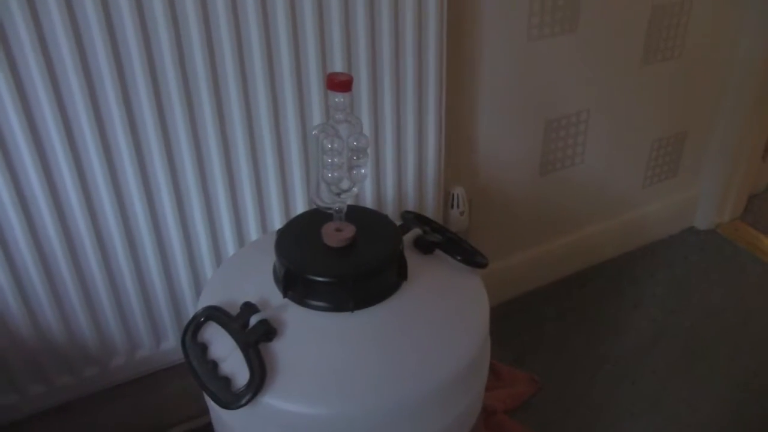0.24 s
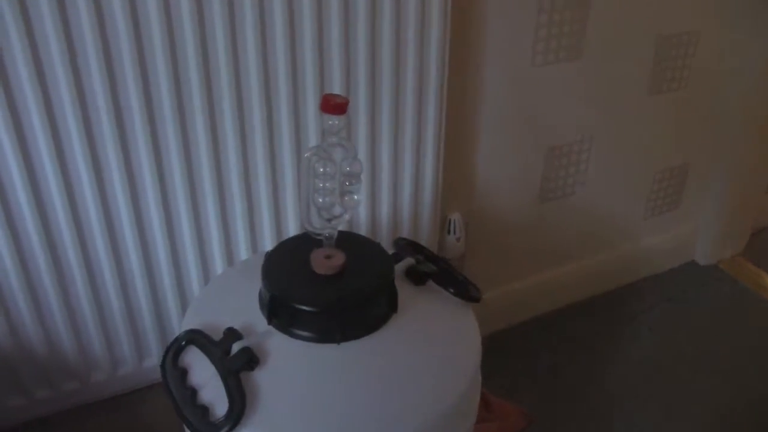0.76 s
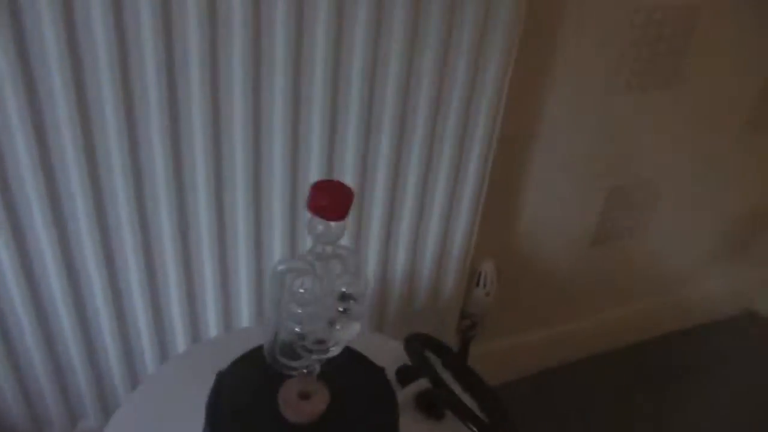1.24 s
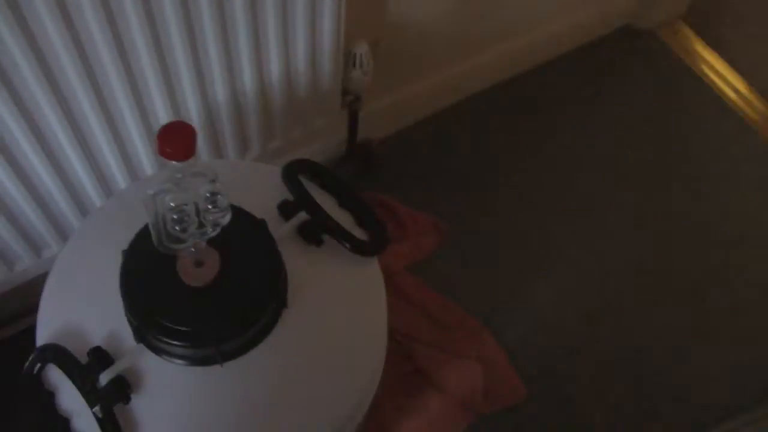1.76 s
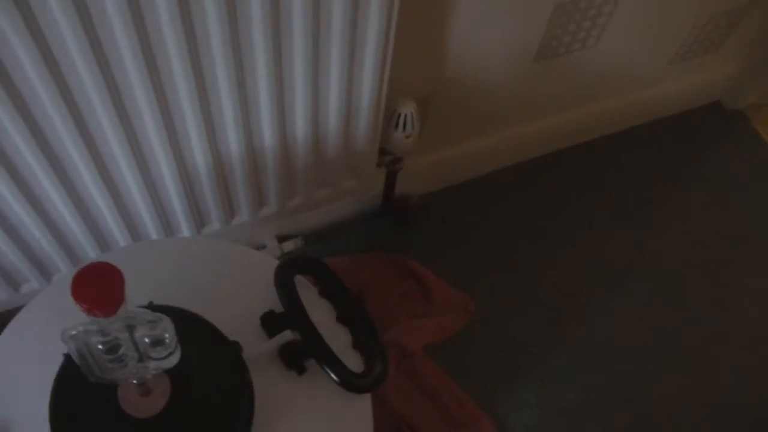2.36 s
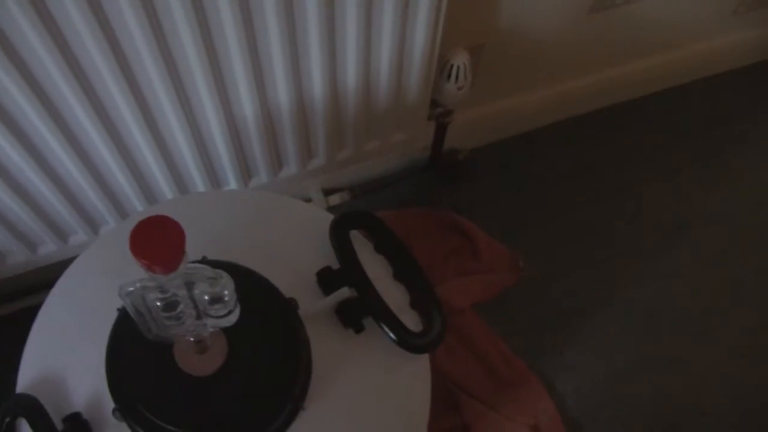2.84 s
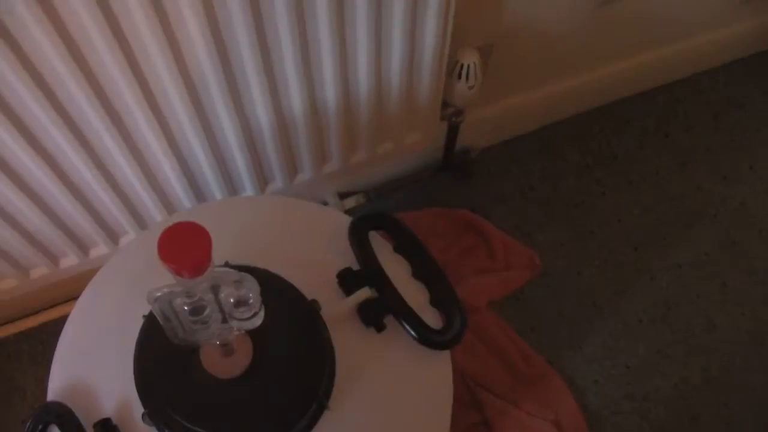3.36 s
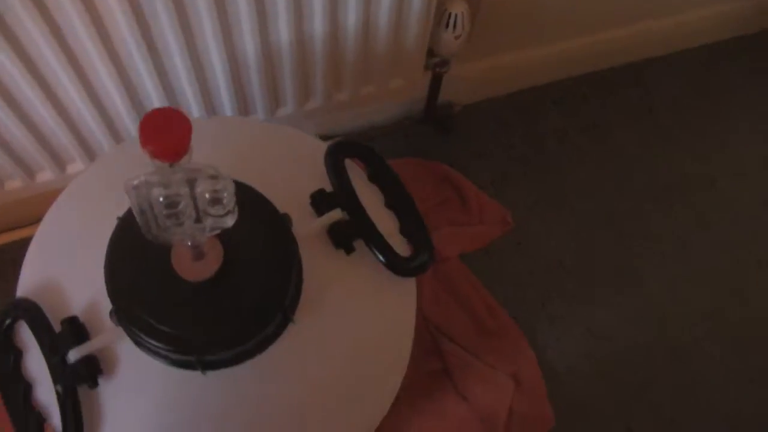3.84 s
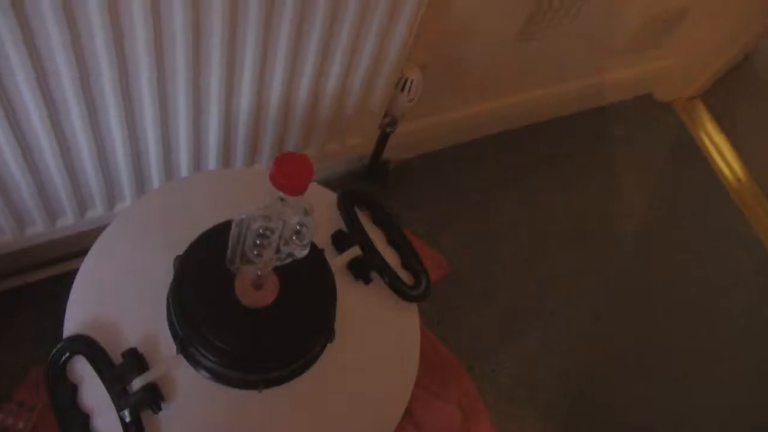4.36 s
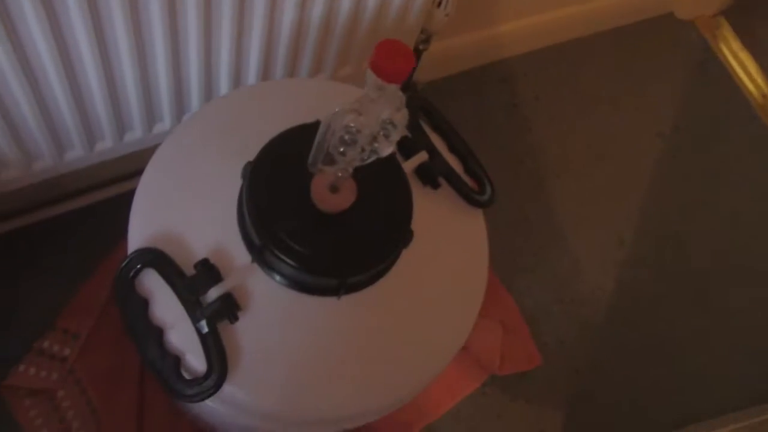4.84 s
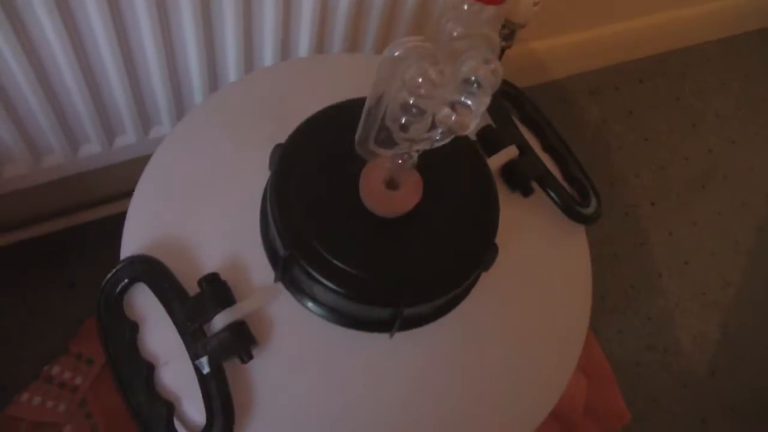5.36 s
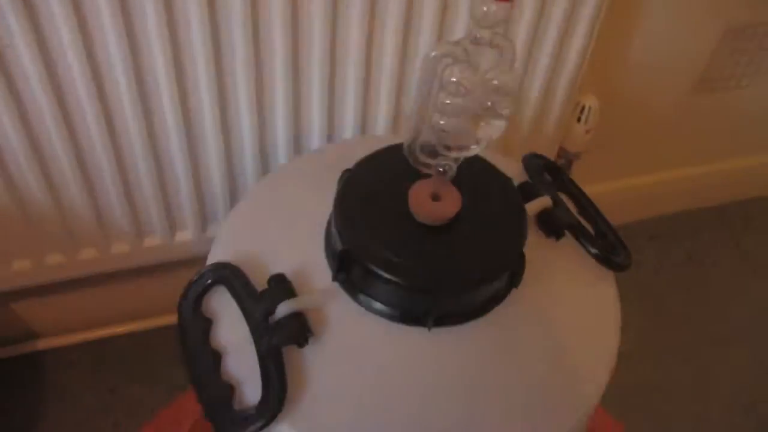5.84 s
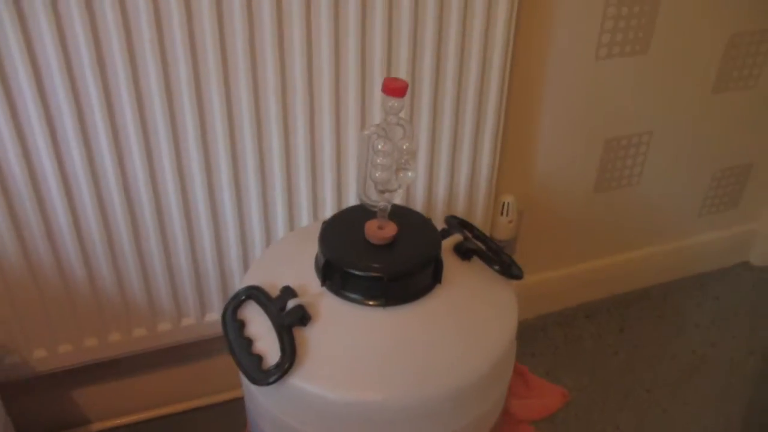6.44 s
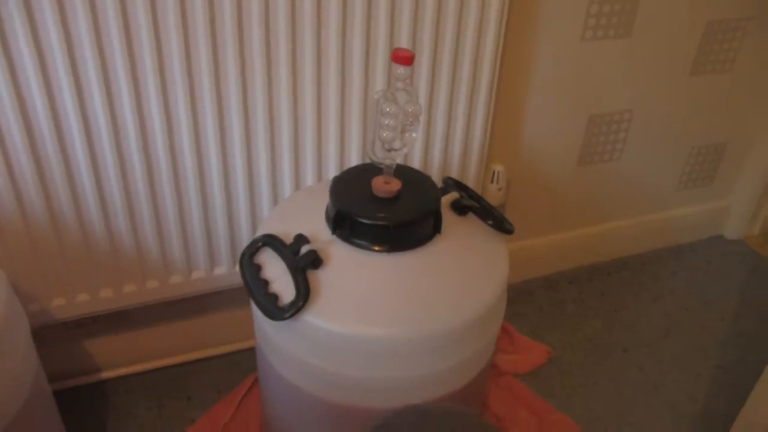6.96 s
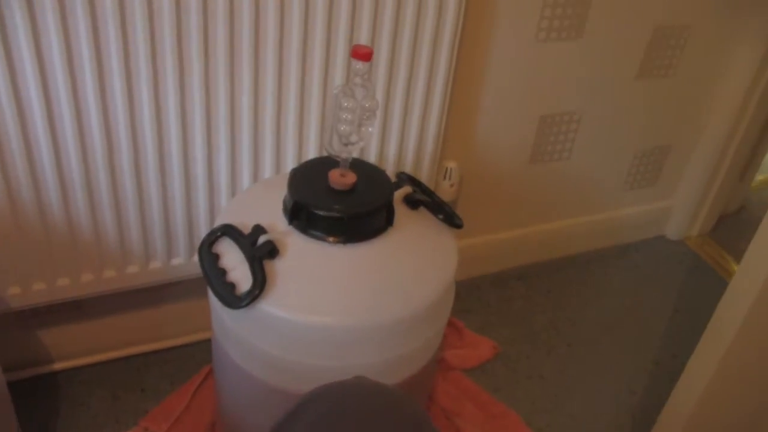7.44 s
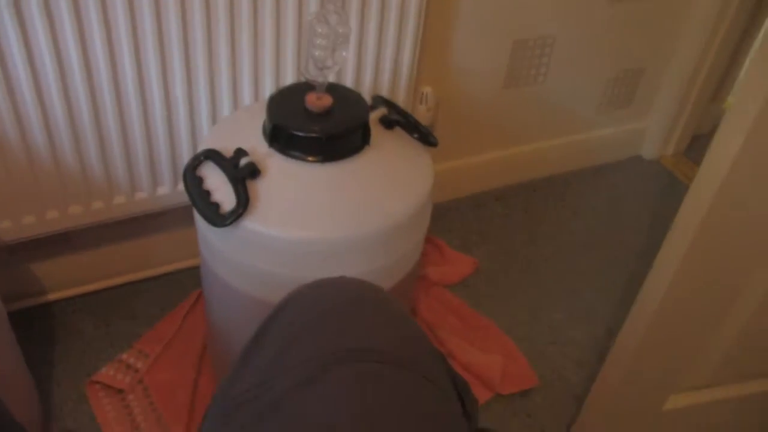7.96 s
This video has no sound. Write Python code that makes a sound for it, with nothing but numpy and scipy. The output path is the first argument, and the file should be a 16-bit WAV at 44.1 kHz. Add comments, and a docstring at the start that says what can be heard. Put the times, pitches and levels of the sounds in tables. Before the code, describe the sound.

A handheld microphone hears a small carpeted room with a soft steady hiss. A person moves nearby, fabric brushing, a gentle footfall and light plastic ticks. After a lull, a single bright watery pop bursts from the airlock, far louder than everything else. Later come sharp little clicks, a quick low-level gurgle with froth, a dull floor thump, brisk cloth swishes and a tiny knock on the hollow bucket.

```python
"""A small carpeted room with a water airlock on a plastic fermenting bucket.
One bubble bursts with a sharp pop: short snaps ring the airlock's modes, with spray noise and gliding gulps.
Later the water gurgles and froths softly, as short tones that slide in pitch.
Someone moves close by: clothes (shaped noise and crackles), footfalls (damped sines), ticks (noise bursts),
knocks on the bucket (modes) and plastic squeaks (glides), over room tone and a faint hum (filtered noise)."""
import sys
import numpy as np
from scipy import signal
from scipy.fft import rfft, irfft, next_fast_len
from scipy.io import wavfile

SR = 44100
rng = np.random.default_rng(int(sys.argv[2]) if len(sys.argv) > 2 else 0)


def pcm_store(signal):
    """Save signal as 16-bit PCM."""
    levels = np.round(np.clip(np.atleast_2d(signal), -1, 1) * 32767)
    wavfile.write(sys.argv[1], SR, levels.astype(np.int16).T)


N = 361487
CUTOFF_HZ = 15900


def from_db(db):
    """Amplitude ratio of a level in dB."""
    return 10 ** (np.asarray(db) / 20)


def rms_one(x):
    """Scale to rms 1."""
    return x / np.sqrt(np.mean(x ** 2) + 1e-20)


def at_hz(points, hz):
    """Read a table on a log-frequency axis."""
    known_hz, values = np.transpose(points)
    return np.interp(np.log(np.maximum(hz, 1)), np.log(known_hz), values)


def seconds(length_s):
    """Time axis in seconds."""
    return np.arange(int(length_s * SR)) / SR


def fade(t, t60_s):
    """Exponential decay, 60 dB down at t60."""
    return np.exp(-np.log(1000) * t / t60_s)


def add(track, start_s, sound):
    """Mix a sound into the track, cut at its end."""
    start = int(round(start_s * SR))
    track[start:start + len(sound)] += sound[:N - start]


def noise(spectrum, size):
    """Noise of the given colour, rms 1."""
    hz = np.fft.rfftfreq(size, 1 / SR)
    white = rng.standard_normal(size)
    return rms_one(irfft(rfft(white) * from_db(at_hz(spectrum, hz)), size))


def drift(rate_hz):
    """Random values of spread 1, joined by straight lines."""
    knots = rng.standard_normal(N // 20)
    return np.interp(np.arange(N) / SR * rate_hz, np.arange(len(knots)), knots)


def band(x, low_hz, high_hz, order=1):
    """Butterworth band-pass."""
    edges_hz = [low_hz, min(high_hz, .45 * SR)]
    return signal.sosfilt(signal.butter(order, edges_hz, "band", fs=SR, output="sos"), x)


def modes(table, t):
    """A body's ring after one sharp blow: a sum of damped cosines."""
    return sum(from_db(db) * np.cos(2 * np.pi * hz * t) * fade(t, t60_s) for hz, db, t60_s in table)


def strokes(rows, attack_s, release_s):
    """Power of a series of strokes: each swells, holds for its length and dies away."""
    power = np.zeros(N)
    for start_s, length_s, db in rows:
        t = seconds(length_s + 5 * release_s)
        level = np.minimum(t / attack_s, 1) * np.exp(-np.maximum(t - length_s, 0) / release_s)
        add(power, start_s, (from_db(db) * level) ** 2)
    return power


def glides(rows, waver, overtone_db):
    """Short tones that swell, slide in pitch and die away, with a weak octave."""
    out, unsteady = np.zeros(N), drift(500)
    for start_s, db, start_hz, end_hz, swell_s, fade_s in rows:
        t = seconds(swell_s + 2 * fade_s)
        hz = np.interp(t, [0, swell_s + fade_s], [start_hz, end_hz])
        hz = hz * (1 + waver * unsteady[int(start_s * SR):][:len(t)])
        phase = 2 * np.pi * np.cumsum(hz) / SR
        level = np.minimum(t / swell_s, 1) * np.exp(-3 * (np.maximum(t - swell_s, 0) / fade_s) ** 1.5)
        add(out, start_s, from_db(db) * level * (np.sin(phase) + from_db(overtone_db) * np.sin(2 * phase)))
    return out


def two_microphones(mid, side):
    """Two close microphones hear nearly the same; returns left and right."""
    # Each row: frequency in Hz, side against mid in dB.
    width_table = [(30, -32), (130, -6.5), (250, -7.5), (500, -6.5), (2000, -11.5), (5000, -14.5),
                   (14000, -11.5)]
    size = next_fast_len(N)
    width = from_db(at_hz(width_table, np.fft.rfftfreq(size, 1 / SR)))
    return mid[:N] + irfft(rfft(side, size) * width, size)[:N] * np.array([[1], [-1]])


def wide_noise(spectrum):
    """Noise from all around, coloured by the room's standing waves."""
    # Standing waves of the small room. Each row: centre in Hz, width in Hz, lift in dB.
    room_modes = [(85.7, 8.4, 8), (143, 17, 3.5), (208.7, 15.3, 8), (264.5, 11, 6), (313, 9, 8),
                  (377, 14, 2.5)]
    size = next_fast_len(N)
    hz = np.fft.rfftfreq(size, 1 / SR)
    lift_db = sum(db / (1 + (2 * (hz - centre_hz) / width_hz) ** 2) for centre_hz, width_hz, db in room_modes)
    lift = from_db(lift_db)
    mid, side = [rms_one(irfft(rfft(noise(spectrum, size)) * lift, size)) for _ in range(2)]
    return two_microphones(mid, side)


def off_centre(x, lead_s=.00001):
    """A source to one side reaches the right microphone a moment sooner, which widens its treble."""
    slope = np.gradient(x) * SR
    return x + slope * lead_s / 2 * np.array([[-1], [1]])


def panned(x, left_db):
    """Left raised and right lowered by left_db."""
    return x * from_db([[left_db], [-left_db]])


def room(x, first_s=0.0022, side_db=-4.5):
    """Dense reflections that die band by band; returns left and right."""
    # Colour of the reflections. Each row: frequency in Hz, level in dB.
    walls = [(100, -5), (400, 7), (700, -2.5), (950, -3), (1300, 6), (2000, 1.5), (4400, 2), (8000, 3),
             (12000, 4), (16000, -8)]
    # The room's decay. Each row: frequency in Hz, t60 in seconds.
    room_t60 = [(200, 0.34), (1000, 0.2), (2500, 0.2), (4500, 0.19), (9000, 0.17), (14000, 0.16)]
    t = seconds(.45)
    hz, edges_hz = np.fft.rfftfreq(len(t), 1 / SR), np.geomspace(60, 17000, 11)
    tails = []
    for white in rfft(rng.standard_normal((2, len(t)))):
        coloured = np.exp(1j * np.angle(white)) * from_db(at_hz(walls, hz))  # random phase only
        tail = np.zeros(len(t))
        for low_hz, high_hz in zip(edges_hz, edges_hz[1:]):
            in_band = (hz >= low_hz) * (hz < high_hz)
            tail += irfft(coloured * in_band, len(t)) * fade(t, at_hz(room_t60, np.sqrt(low_hz * high_hz)))
        tail *= np.clip(t / first_s - 1, 0, 1)  # silent until first_s
        tails.append(signal.oaconvolve(x, tail / np.linalg.norm(tail))[:N])
    return two_microphones(tails[0], from_db(side_db) * tails[1])


def room_tone():
    """Steady broadband noise from all around, rms 1 in the mid."""
    # Each row: frequency in Hz, level in dB per Hz.
    tone_spectrum = [(20, 3.5), (55, -0.5), (110, -1), (230, -4.5), (400, -3.5), (1000, -11), (2000, -15),
                     (4000, -17), (8000, -21.5), (16000, -31)]
    return wide_noise(tone_spectrum)


def hums(width_hz=16, attack_s=0.044, release_s=0.09):
    """A narrow, unsteady low drone that swells and fades: band-passed noise."""
    # Each row: start in seconds, length in seconds, level in dB, pitch in Hz.
    hum_rows = [(1.9, 0.58, -70.5, 84), (4.523, 0.82, -69.5, 151.5)]
    out = np.zeros(N)
    for start_s, length_s, db, hz in hum_rows:
        drone = rms_one(band(rng.standard_normal(N), hz - width_hz / 2, hz + width_hz / 2, order=2))
        out += np.sqrt(strokes([(start_s, length_s, db)], attack_s, release_s)) * drone
    return out


def movement_db():
    """How briskly the person moves at each moment."""
    # Reference level for stirring cloth and faint ticks. Each row: time in seconds, level in dB.
    movement = [(0.0, -64), (0.34, -63.5), (0.44, -68.5), (0.68, -62), (1.23, -59.5), (1.85, -57.5),
                (2.08, -61), (3.04, -70.5), (3.9, -68), (4.04, -69), (4.38, -63), (4.54, -64.5),
                (5.13, -62.5), (5.46, -61), (5.66, -57), (6.94, -58.5), (7.15, -63.5), (7.35, -62),
                (7.52, -66), (7.76, -61), (8.2, -72)]
    return np.interp(np.arange(N) / SR, *np.transpose(movement))


def crackle(rate_per_s=90, scatter_db=4):
    """The weave catches and lets go in tiny snaps of uneven size; rms 1."""
    # Each row: frequency in Hz, level in dB.
    crackle_spectrum = [(100, -10), (280, 2), (750, 1), (1500, -4), (3000, -8), (7000, -17), (16000, -30)]
    size = next_fast_len(N)
    sizes = from_db(scatter_db * np.minimum(rng.exponential(1, size), 2)) * rng.choice([-1, 1], size)
    snaps = sizes * (rng.random(size) < rate_per_s / SR)
    colour = from_db(at_hz(crackle_spectrum, np.fft.rfftfreq(size, 1 / SR)))
    return rms_one(irfft(rfft(snaps) * colour, size))[:N]


def clothes(lumpy_db=2.0, grain_db=1.1, uneven_db=0.53, crackle_db=-7.5):
    """Cloth stirs with movement, louder at each stroke; folds flap in lumps, the weave slips in a fine grain."""
    # A heavy fold shifts. Each row: start in seconds, length in seconds, level in dB,
    # low flutter against that in dB.
    flap_rows = [(0.0, 0.14, -65, -8), (0.927, .051, -57, -7), (1.184, .07, -63.5, 0),
                 (1.298, 0.038, -57, -8), (1.864, .12, -56.5, -3), (4.835, .032, -62.5, -5),
                 (5.45, .2, -62, 3), (5.68, .19, -58.5, -3), (6.157, 0.045, -49.5, -13),
                 (6.266, 0.58, -58, -7.5), (6.384, 0.17, -61, 4), (6.628, 0.13, -63, 3.5),
                 (6.872, 0.24, -58, -9), (7.216, 0.31, -65, -5), (7.886, .06, -60.5, -1.5)]
    # A sleeve or trouser leg slides over itself. Each row: start in seconds, length in seconds, level in dB,
    # swish against rubbing in dB.
    slide_rows = [(0.555, 0.14, -59, -1), (0.91, 0.056, -61, -2.5), (1.167, .07, -57, -3),
                  (1.859, 0.032, -56.5, -2.5), (3.858, 0.098, -59.5, -7), (4.044, 0.039, -57.5, -7),
                  (4.368, 0.15, -65, -0.5), (4.624, 0.21, -69.5, 4), (5.717, 0.14, -63.5, 0),
                  (6.36, 0.24, -66.5, 6), (6.802, 0.25, -64.5, 5), (7.602, 0.093, -68.5, -7),
                  (7.963, 0.044, -61, -7)]
    # Four spectra. Each row: frequency in Hz, level in dB per Hz.
    folds_spectrum = [(40, -17), (120, -5), (220, -3), (400, -0.5), (750, -0.5), (1200, -9.5),
                      (2200, -18.5), (5000, -52)]
    flutter_spectrum = [(60, -23), (130, -4), (200, -0.5), (330, -2.5), (520, -6), (900, -32)]
    rubbing_spectrum = [(400, -22), (900, -1.5), (1400, -0.5), (2000, -2), (2700, -2), (4000, -6.5),
                        (6000, -7.5), (12000, -32)]
    swish_spectrum = [(1500, -28), (3500, -5), (4800, -6), (6300, 1), (8500, -3), (10200, -3), (12500, -7),
                      (16000, -10.5)]
    flap_times = dict(attack_s=0.009, release_s=0.039)
    slide_times = dict(attack_s=0.02, release_s=0.059)

    stir = from_db(movement_db() + uneven_db * drift(14))
    flaps = strokes([(s, length, db) for s, length, db, _ in flap_rows], **flap_times)
    flutters = strokes([(s, length, db + low_db) for s, length, db, low_db in flap_rows], **flap_times)
    rubs = strokes([(s, length, db) for s, length, db, _ in slide_rows], **slide_times)
    swishes = strokes([(s, length, db + bright_db) for s, length, db, bright_db in slide_rows], **slide_times)

    def moving(stir_db, power, spectrum):
        """Constant stirring and strokes add in power."""
        return np.sqrt((from_db(stir_db) * stir) ** 2 + power) * wide_noise(spectrum)

    folds = moving(-5.5, flaps, folds_spectrum) + np.sqrt(flutters) * wide_noise(flutter_spectrum)
    sliding = moving(-2.5, rubs, rubbing_spectrum) + moving(-6.5, swishes, swish_spectrum)
    crackles = from_db(crackle_db) * np.sqrt(stir ** 2 + flaps) * crackle()
    return folds * from_db(lumpy_db * drift(90)) + sliding * from_db(grain_db * drift(500)) + crackles


def footfalls(rise_s=0.0015):
    """A foot loads the floor gently through the carpet; the boards swing a few times."""
    # Each row: start in seconds, level in dB, floor's ring in Hz, t60 in seconds.
    steps = [(1.364, -54, 75, 0.15), (1.902, -42.5, 146, 0.065), (4.087, -46, 116, .087),
             (4.092, -52.5, 229, .06), (4.915, -51.5, 66, .15), (5.685, -41.5, 222, 0.08),
             (5.718, -40, 134, 0.12), (5.718, -41, 68.4, 0.18)]
    out, t = np.zeros(N), seconds(.4)
    for start_s, db, hz, t60_s in steps:
        swing = np.sin(2 * np.pi * hz * t) * fade(t, t60_s)
        add(out, start_s, from_db(db) * swing * (1 - np.exp(-t / rise_s)))
    return out


def faint_ticks(rate_per_s=7, above_movement_db=9.5, scatter_db=2.5, low_hz=700, high_hz=10000, t60_s=0.01):
    """Chance contacts, stronger when the movement is brisk; rows like those of ticks()."""
    times_s = np.cumsum(rng.exponential(1, size=120)) / rate_per_s
    sizes, pitches = rng.uniform(-1.1, 1, size=120), rng.random(size=120)
    brisk_db = movement_db()
    rows = []
    for start_s, size, pitch in zip(times_s, sizes, pitches):
        if start_s * SR < N - 1:
            db = brisk_db[int(start_s * SR)] + above_movement_db + scatter_db * size
            rows.append((start_s, db, low_hz * (high_hz / low_hz) ** pitch, t60_s))
    return rows


def ticks(spread=2.28, rise_s=.0004):
    """Each contact is a burst of tiny slips in a heavily damped, slightly hollow body."""
    # Each row: start in seconds, peak before the hollow rings in dB, centre in Hz, t60 of the slips in seconds.
    tick_rows = [(.021, -45.5, 1470, 0.048), (.32, -43.5, 6500, 0.0033), (0.935, -44, 4000, 0.018),
                 (1.002, -44, 2600, .015), (1.123, -42.5, 3460, 0.034), (1.334, -46.5, 650, 0.034),
                 (1.417, -47, 4000, .008), (1.875, -40.5, 650, 0.072), (1.891, -35.5, 2300, .06),
                 (1.984, -47, 850, 0.042), (2.207, -38, 2980, 0.011), (2.605, -50, 3200, .02),
                 (2.895, -50.5, 5000, .008), (3.2966, -42.5, 1750, 0.04), (3.883, -42, 3500, .014),
                 (3.904, -46.5, 1400, .04), (3.952, -36, 3300, .024), (4.105, -50, 2400, .015),
                 (4.391, -43.5, 990, 0.052), (4.435, -42.5, 1590, 0.017), (4.467, -42.5, 1390, 0.032),
                 (4.564, -44, 2310, 0.026), (4.862, -46.5, 1200, 0.037), (5.382, -35.5, 5600, 0.031),
                 (5.5045, -30, 5600, .007), (5.5062, -32, 5760, .014), (5.533, -41.5, 2900, 0.035),
                 (5.690, -35.5, 3760, .0041), (5.744, -44, 2600, .025), (5.886, -44, 1400, .05),
                 (6.343, -43.5, 880, .016), (6.455, -46, 1300, .012), (6.733, -45, 1000, .03),
                 (6.98, -42, 1700, 0.043), (7.042, -39.5, 1900, 0.0056), (7.086, -46, 850, .04),
                 (8.051, -48.5, 890, .025)]
    # Hollow resonances of the handled plastic. Each row: centre in Hz, width in Hz, gain as a ratio.
    hollow = [(900, 230, 1), (1555, 300, 0.81)]
    out, t = np.zeros(N), seconds(.3)
    for start_s, db, hz, t60_s in tick_rows + faint_ticks():
        slips = rng.standard_normal(len(t)) * fade(t, t60_s) * (1 - np.exp(-t / rise_s))
        burst = band(slips, hz / spread, hz * spread, order=2)
        add(out, start_s, from_db(db) * burst / np.abs(burst).max())
    rings = [gain * signal.lfilter(*signal.iirpeak(hz, hz / width_hz, fs=SR), out + 1e-18)
             for hz, width_hz, gain in hollow]
    return out + sum(rings)


def squeaks():
    """Brief squeaks and pings of plastic, as wavering glides."""
    # Each row: start in seconds, level in dB, start pitch in Hz, end pitch in Hz, swell and fade in seconds.
    squeak_rows = [(1.184, -48, 2950, 3000, .014, .028), (1.205, -38, 2970, 2830, .004, 0.017),
                   (1.195, -57, 5550, 5650, .01, .02)]
    return glides(squeak_rows, waver=0.027, overtone_db=-26.0)


def knocks(lowest_hz=600, highest_hz=4500):
    """Something taps the hollow bucket's wall, which rings briefly."""
    # Each row: start in seconds, level in dB.
    knock_rows = [(.495, -51), (4.391, -56), (7.3495, -42), (7.373, -56), (7.511, -56), (7.728, -57),
                  (7.793, -55)]
    # Modes of the bucket's wall, before the band-pass. Each row: frequency in Hz, level in dB, t60 in seconds.
    bucket = [(845, 0, 0.026), (1080, -2, 0.017), (1540, 0, 0.024), (2160, -5.5, .016), (3270, -7, .008),
              (4460, -8, .009)]
    out = np.zeros(N)
    ring = band(modes(bucket, seconds(.1)), lowest_hz, highest_hz, order=2)
    for start_s, db in knock_rows:
        add(out, start_s, from_db(db) * ring)
    return out


def froth(start_s=5.53, length_s=.4, count=45, level_db=-52, scatter_db=2, sinks_db_per_s=8,
          low_hz=800, high_hz=2780, fade_cycles=11.4, rise_ratio=1.13, swell_s=0.00098):
    """Tiny rising bubbles, fainter as the water settles; rows like those of gurgles()."""
    rows = []
    for when, size, pitch in rng.random((count, 3)):
        age_s = when * length_s
        hz = low_hz * (high_hz / low_hz) ** pitch
        db = level_db + scatter_db * (2 * size - 1) - sinks_db_per_s * age_s
        rows.append((start_s + age_s, db, hz, hz * rise_ratio, swell_s, fade_cycles / hz))
    return rows


def gurgles():
    """Gas pockets slip through the water, each a wavering glide, with froth among them."""
    # Each row: start in seconds, level in dB, start pitch in Hz, end pitch in Hz, swell and fade in seconds.
    gurgle_rows = [(5.440, -42.5, 557, 570, 0.0018, 0.021), (5.440, -51, 1040, 1000, 0.0033, .012),
                   (5.463, -48, 280, 330, 0.0041, 0.012), (5.476, -39.5, 492, 850, 0.015, 0.0207),
                   (5.505, -48, 765, 775, .005, .014), (5.520, -43, 440, 596, .014, 0.013),
                   (5.532, -45, 1900, 1980, 0.0027, 0.0076), (5.544, -48, 1100, 1150, .003, .008),
                   (5.547, -32.5, 734, 716, 0.0038, 0.0084), (5.552, -45, 284, 318, 0.0045, .017),
                   (5.564, -49, 770, 740, .005, .018), (5.590, -35.5, 1000, 860, 0.0075, .016),
                   (5.591, -42, 525, 504, 0.0069, 0.014), (5.594, -47, 300, 300, 0.0054, 0.013),
                   (5.618, -51, 855, 980, .019, .008), (5.638, -50, 760, 800, 0.0027, 0.026)]
    return glides(gurgle_rows + froth(), waver=0.039, overtone_db=-31)


def gulps():
    """The airlock's chamber rings hollow at each gulp of gas."""
    # Each row: start in seconds, level in dB, start pitch in Hz, end pitch in Hz, swell and fade in seconds.
    gulp_rows = [(3.296, -44.5, 930, 950, 0.00089, .013), (3.2965, -50, 1840, 1800, .001, .02),
                 (3.304, -41, 940, 940, .002, 0.0064), (3.3277, -17.5, 937, 930, 0.00204, 0.01),
                 (3.3356, -14.5, 990, 1000, 0.0024, .0055)]
    return glides(gulp_rows, waver=0.016, overtone_db=-26.5)


def pops(spray_t60_s=0.023, lowest_hz=900):
    """Each film snaps, rings the airlock at the water's pitch and flings fine spray at its walls."""
    # Bursting films. Each row: start in seconds, level in dB, decay time of the snap in seconds, spray in dB,
    # speed of the ring as the water shifts (ratio, 1 = at rest).
    pop_rows = [(3.3272, -23, .00018, -37, 1.0), (3.3299, -14, 0.000044, -20.5, 1.02),
                (3.3334, -22, 0.000033, -14.5, 0.98), (3.3376, -26, 0.000044, -25, 1.2)]
    # Tubes and plastic walls at rest, before the band-pass. Each row: frequency in Hz, level in dB,
    # t60 in seconds.
    airlock = [(1400, -10, 0.014), (1870, -9, .012), (2400, -5, 0.0097), (3100, -11, .008),
               (4000, -12, 0.0079), (4600, 0, 0.011), (5270, -2, .01), (6546, -13, .011), (7540, -12, .012),
               (8900, -7, 0.0098)]
    # Each row: frequency in Hz, level in dB per Hz.
    spray_spectrum = [(100, -26), (430, -7), (620, -11), (1200, 0.5), (2500, 1.5), (3400, 2), (4700, 8),
                      (6300, 2.5), (8500, 1), (11000, -6), (14000, -6), (16000, -23)]
    out, t = np.zeros(N), seconds(0.16)
    for start_s, db, snap_s, spray_db, pitch in pop_rows:
        snap = np.exp(-t / snap_s)  # a longer snap sounds duller
        body = band(modes(airlock, t * pitch), lowest_hz, CUTOFF_HZ, order=2)  # so small a body radiates no bass
        add(out, start_s, from_db(db) * signal.oaconvolve(snap / snap.sum(), body))
        spray = noise(spray_spectrum, len(t)) * fade(t, spray_t60_s)
        add(out, start_s, from_db(spray_db) * spray)
    return out


def scene(pop_wet_db=-7.0, near_wet_db=-8.0, tone_db=-65.5,
          pop_pan_db=-0.3, near_pan_db=-0.1, around_pan_db=-0.2):
    """The airlock and the small noises around it share one room."""
    around = room_tone() * from_db(tone_db) + hums() + clothes()
    small = footfalls() + ticks() + squeaks() + knocks() + gurgles()
    burst = gulps() + pops()
    reflected = room(from_db(pop_wet_db) * burst + from_db(near_wet_db) * small)
    popping = panned(off_centre(burst) + reflected, pop_pan_db)
    return popping + panned(small, near_pan_db) + panned(around, around_pan_db)


def record(dry):
    """The converter rests slightly off zero; the top is cut steeply."""
    low_pass = signal.ellip(10, .1, 80, CUTOFF_HZ, fs=SR, output="sos")
    return signal.sosfilt(low_pass, dry) + .0022


dry = scene()
out = record(dry)
pcm_store(out)
```